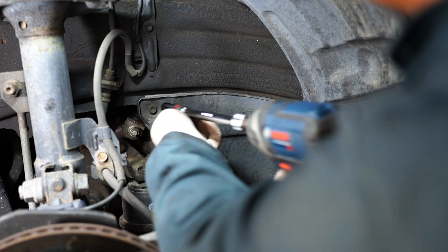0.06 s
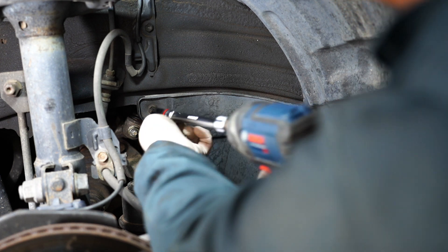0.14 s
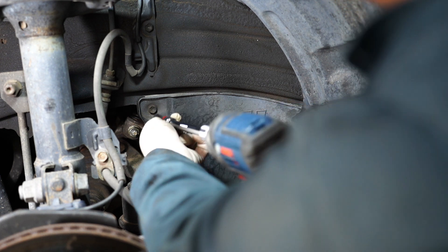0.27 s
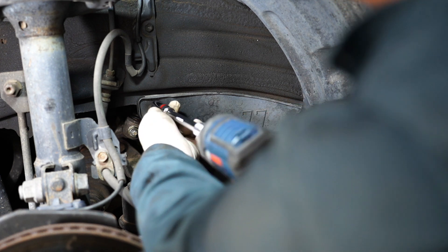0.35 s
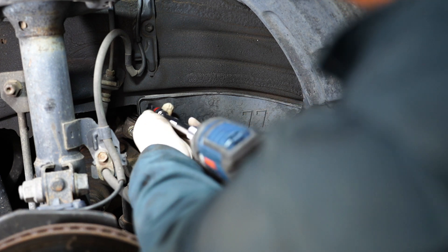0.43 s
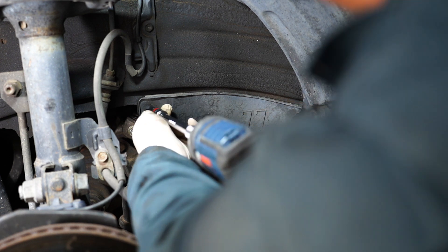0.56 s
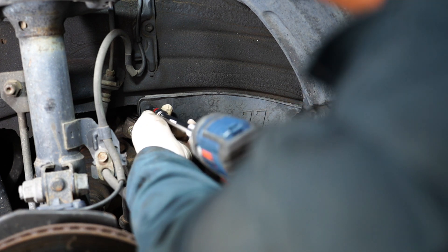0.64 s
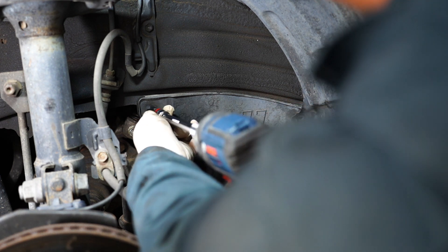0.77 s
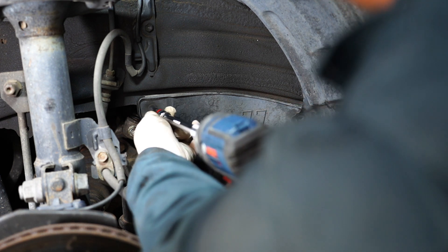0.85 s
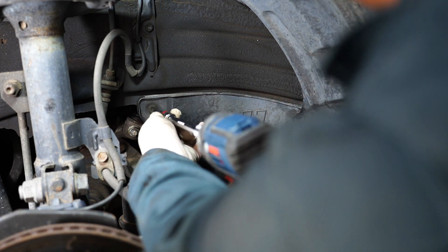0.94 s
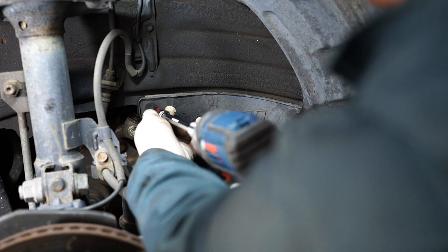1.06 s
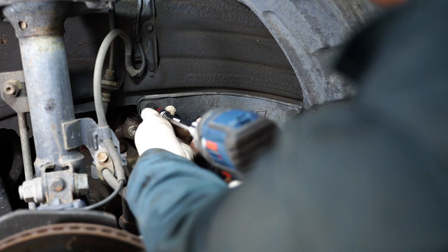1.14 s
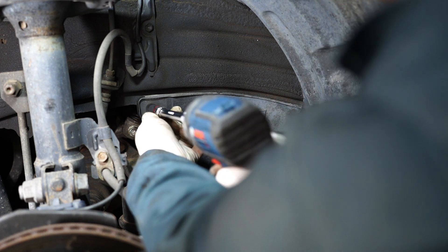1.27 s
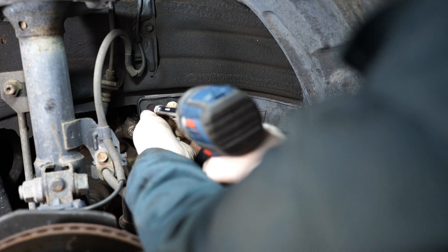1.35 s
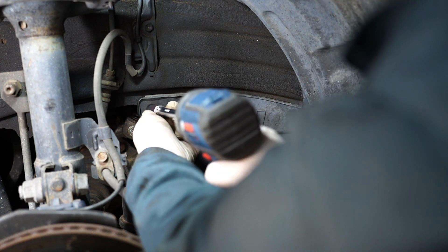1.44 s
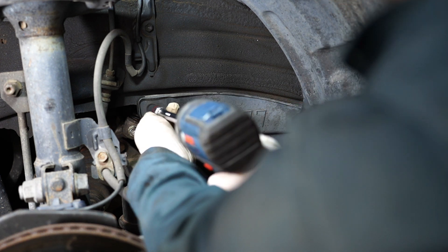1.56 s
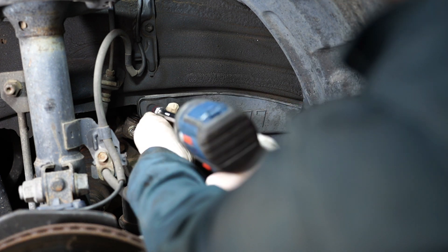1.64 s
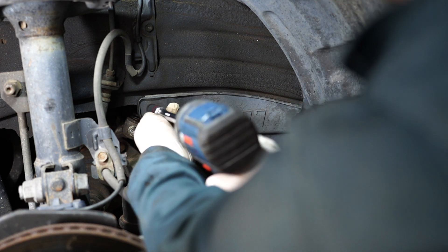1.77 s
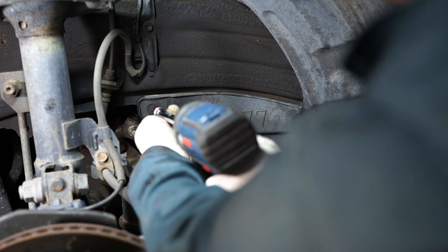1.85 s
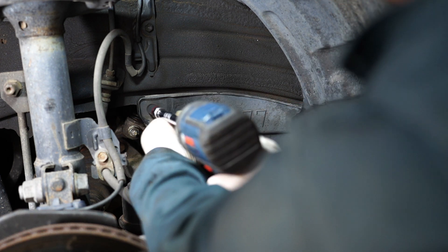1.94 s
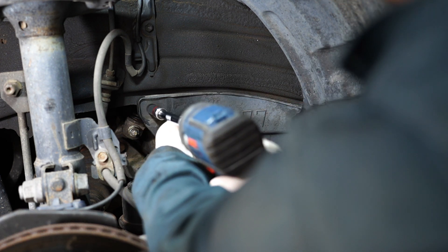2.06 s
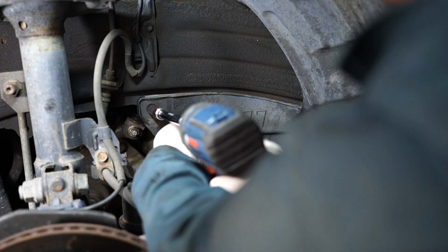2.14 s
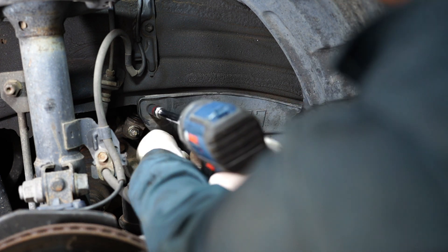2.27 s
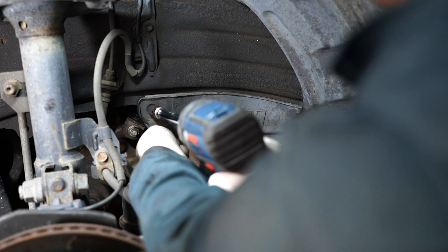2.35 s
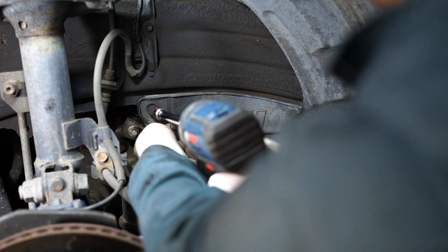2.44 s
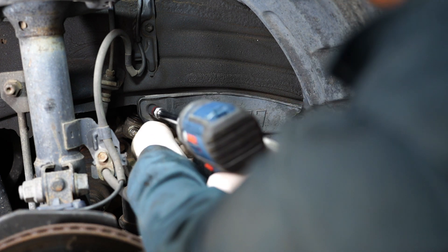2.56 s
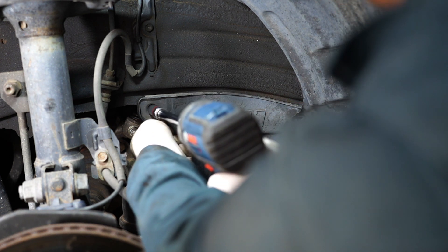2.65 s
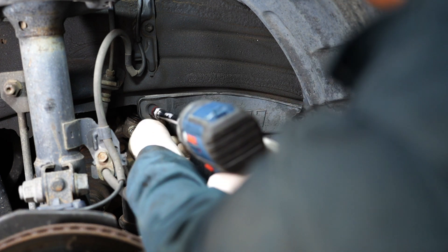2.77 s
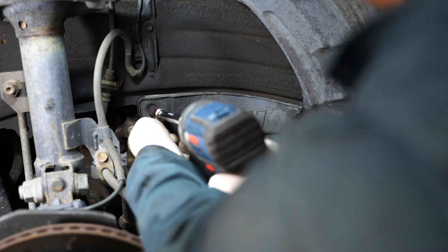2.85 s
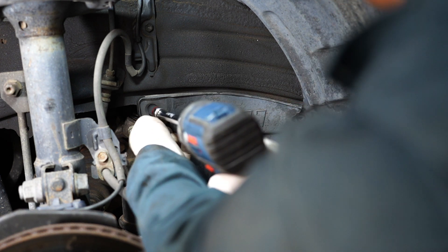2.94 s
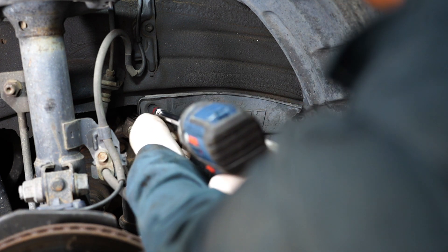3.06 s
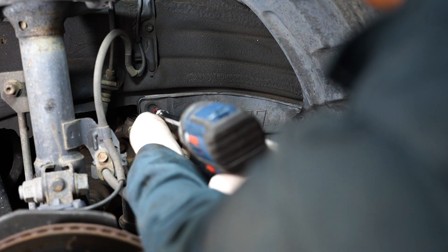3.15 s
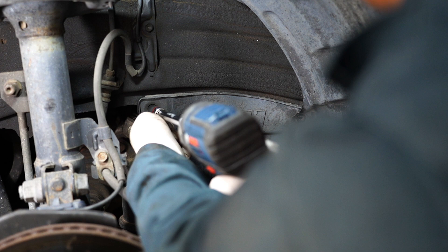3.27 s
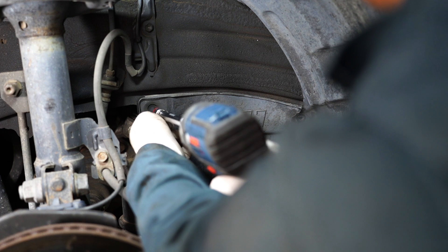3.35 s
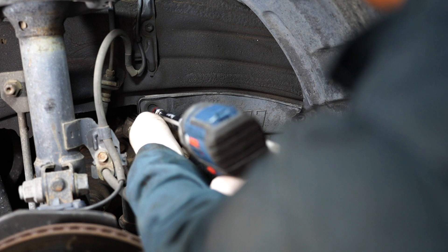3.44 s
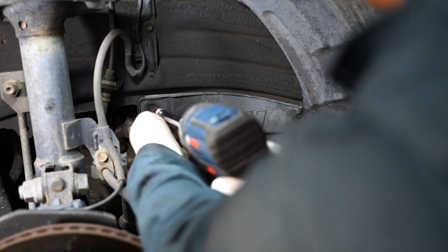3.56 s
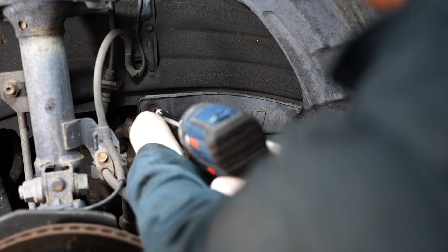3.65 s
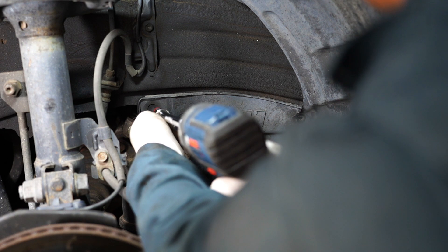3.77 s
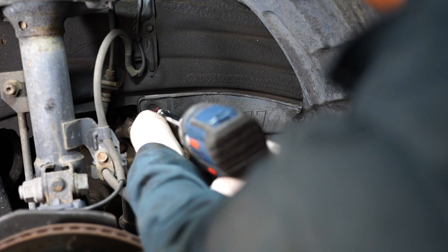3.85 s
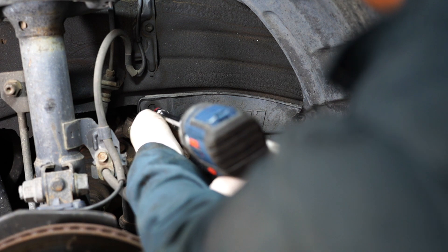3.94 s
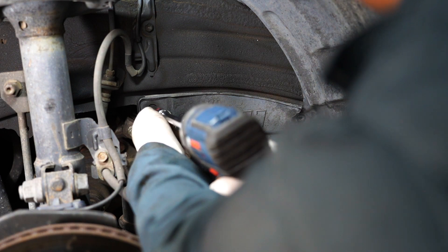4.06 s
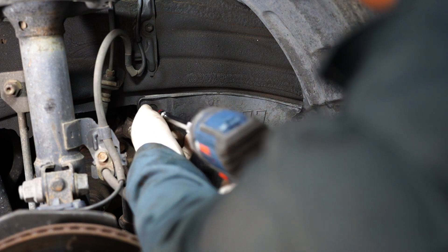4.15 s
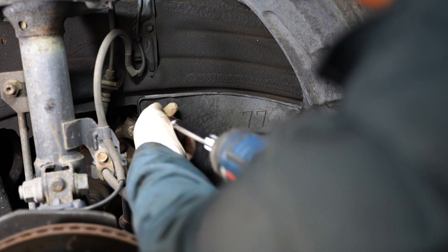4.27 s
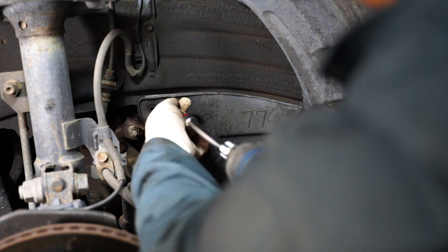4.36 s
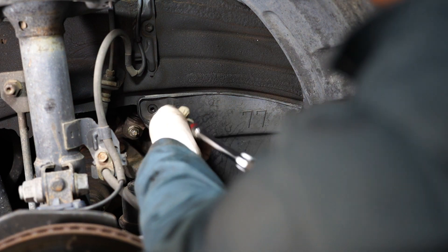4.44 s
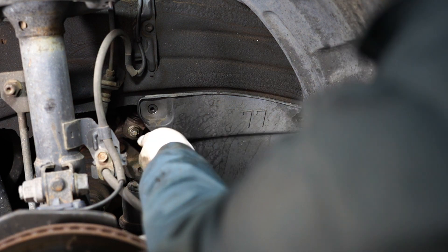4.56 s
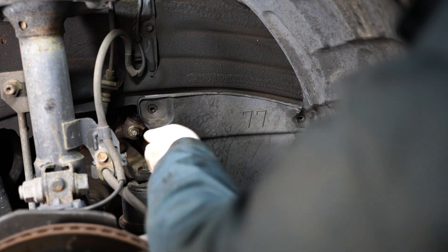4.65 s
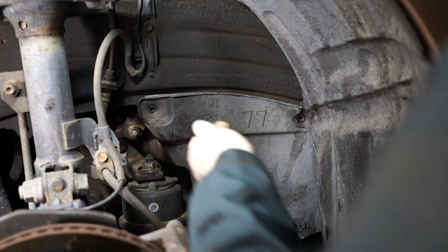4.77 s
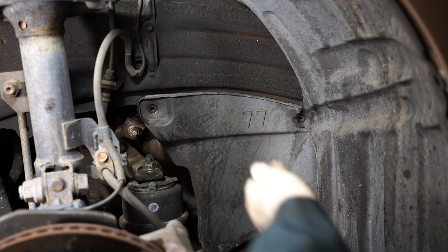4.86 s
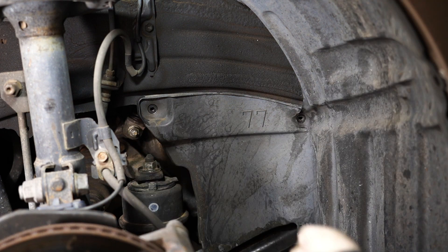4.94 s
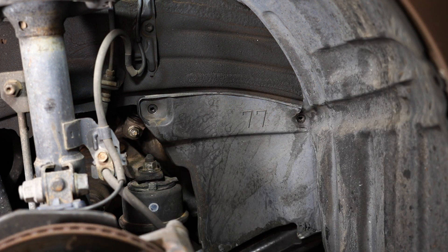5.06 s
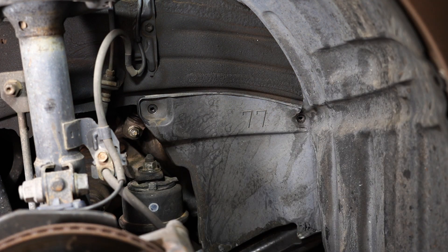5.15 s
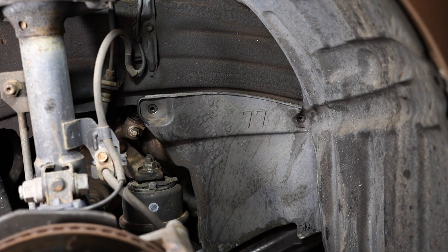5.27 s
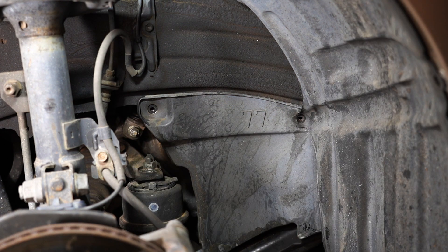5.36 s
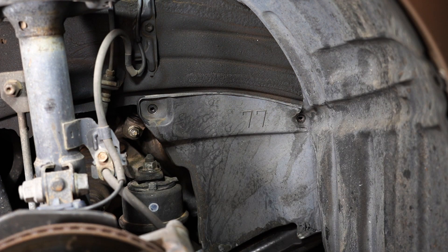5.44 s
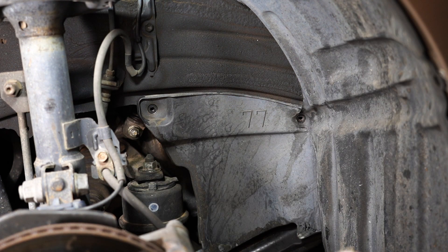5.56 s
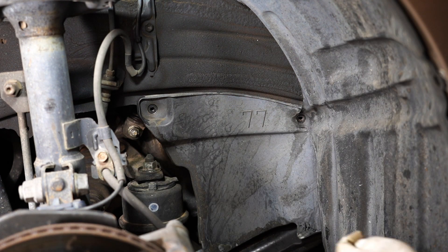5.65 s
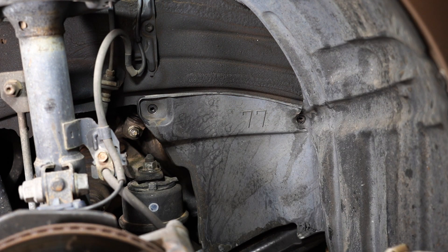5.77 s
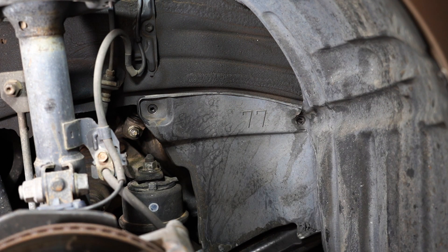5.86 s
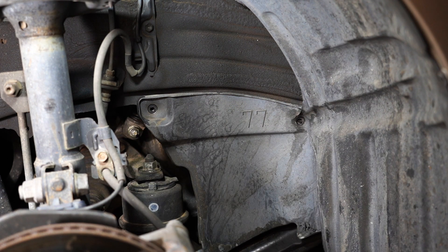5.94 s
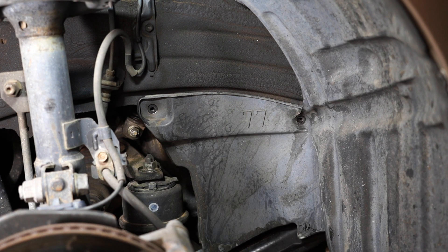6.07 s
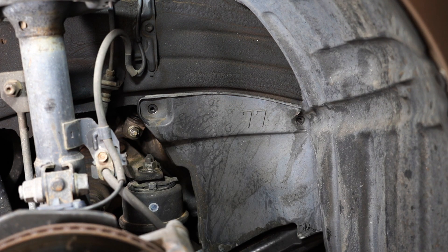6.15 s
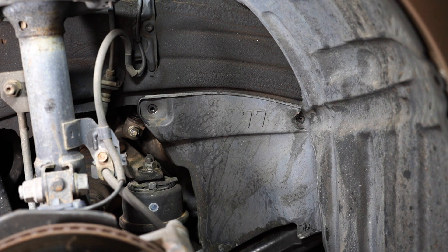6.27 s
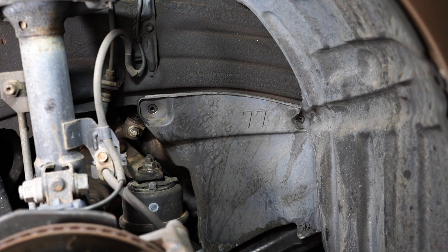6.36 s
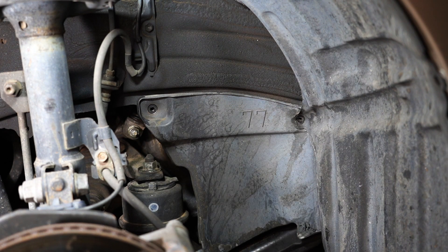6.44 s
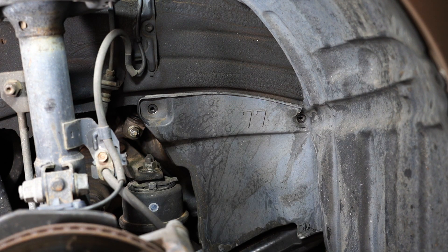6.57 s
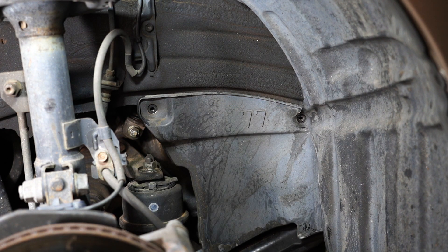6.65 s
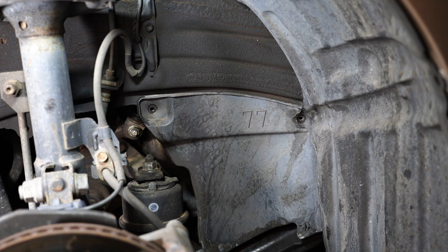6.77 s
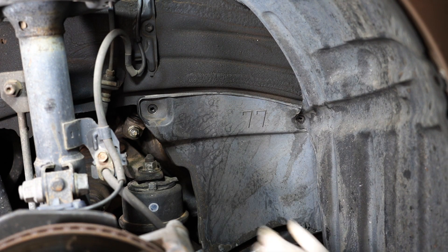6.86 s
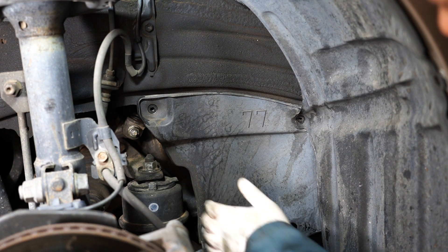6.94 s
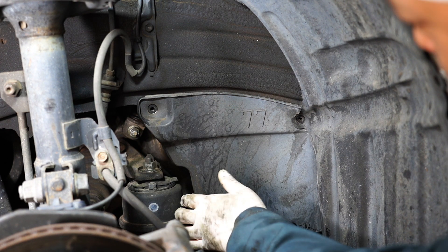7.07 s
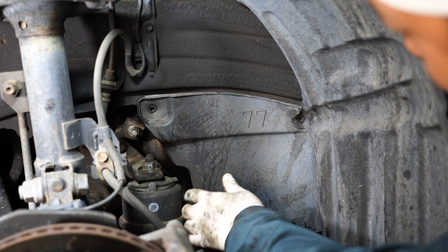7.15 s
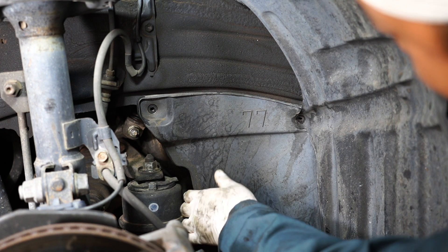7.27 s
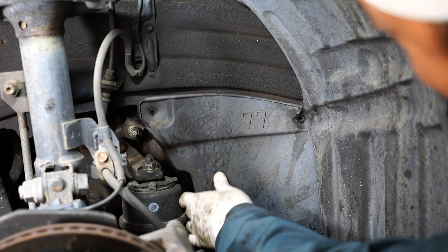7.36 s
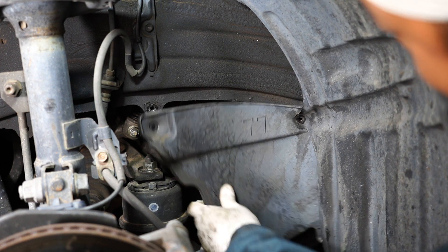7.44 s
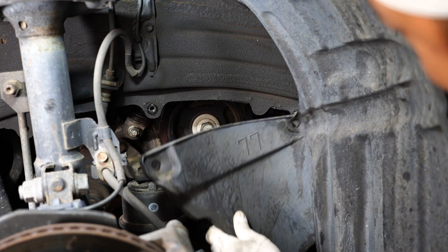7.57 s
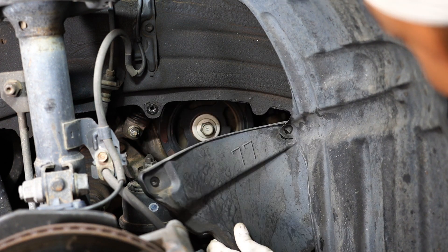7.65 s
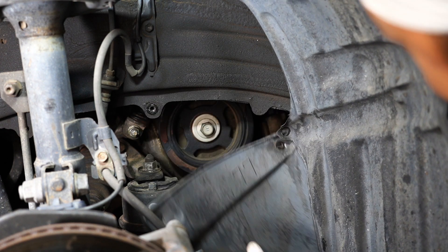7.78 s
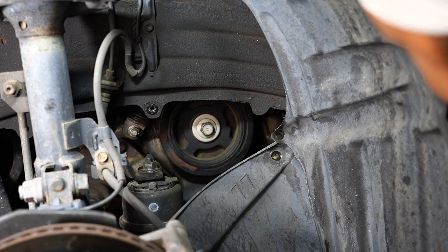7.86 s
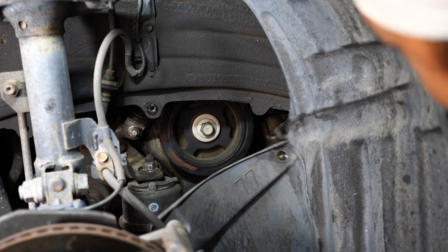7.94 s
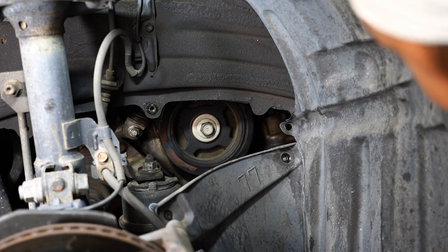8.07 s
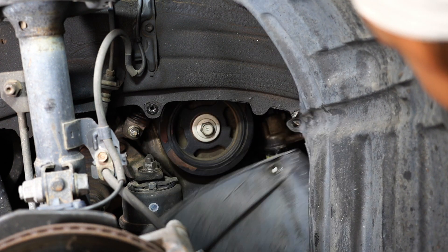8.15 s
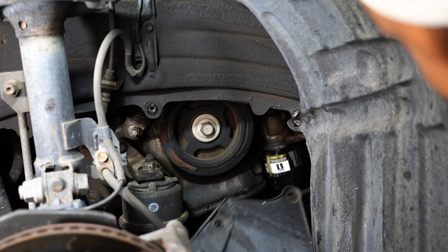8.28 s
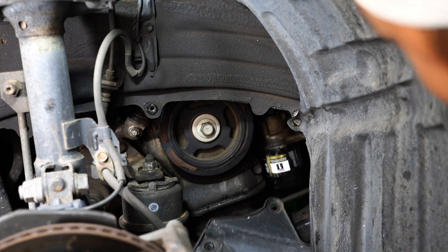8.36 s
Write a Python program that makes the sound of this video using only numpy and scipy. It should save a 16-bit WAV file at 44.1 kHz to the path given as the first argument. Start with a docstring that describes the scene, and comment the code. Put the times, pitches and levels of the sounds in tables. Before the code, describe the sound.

In a reverberant garage with low ventilation rumble, tool and hands knock dully and the socket taps hollow plastic. A cordless driver bursts on with rapid hammer blows and a rising growl, sags, then whirrs steadily as the loose bolt rattles. It stops with small clicks; steel clatters down and skids. After quiet knocks, a stiff plastic panel scrapes, cracks and booms free. Close stereo microphone, roomy echoes.

```python
"""In a reverberant garage, a cordless impact driver breaks a bolt loose in a car's wheel well and spins it out.
Socket and bolt click, the tool is laid down with a clatter, and a plastic splash panel is tugged free.
Motor, gears and the wobbling socket follow one speed; blows are short noise bursts that ring resonances.
Sleeves rustle as filtered noise over a low room hum, and moving echo paths place it all in the garage."""
import sys
import numpy as np
from scipy import signal
from scipy.fft import rfft, irfft, next_fast_len
from scipy.io import wavfile
from scipy.ndimage import map_coordinates

SR = 44100
rng = np.random.default_rng(int(sys.argv[2]) if len(sys.argv) > 2 else 0)


def wrap_up_sound(samples):
    """Save the sound to the file named by the first command line argument, as 16-bit audio."""
    columns = np.atleast_2d(samples).T
    # keep every value between -1 and 1, then stretch to whole-number steps
    tamed = np.clip(columns, -1, 1)
    steps = np.round(tamed * 32767).astype(np.int16)
    wavfile.write(sys.argv[1], SR, steps)


N = 370874
T = np.arange(N) / SR  # time axis [s]

# Hammer blows on the anvil: (time [s], level [dB], thud [dB], hardness [dB per octave])
HAMMER_BLOWS = [(1.837, -33, 16, 1.5), (1.868, -30.5, 0, 6.5), (1.901, -33.5, -2, 5.5), (1.925, -36, 3, 1)]
# Resonances of the bodywork around the bolt: (frequency [Hz], width [Hz], level [dB])
BODYWORK_MODES = [(107, 15, -15), (178, 26, -6), (212, 19, 0.5), (245, 30, -5.5), (307, 70, -2),
                  (427, 28, -7), (580, 170, -6.5), (630, 50, -12.5), (830, 33, -4.5)]
# Resonances of the plastic panel's body: (frequency [Hz], width [Hz], level [dB])
PANEL_BODY_MODES = [(162, 16, 5), (234.5, 44, 7.5), (269, 16, 1), (319, 16, 1), (454, 35, 2)]
# Resonances of the panel's bending sheet: (frequency [Hz], width [Hz], level [dB])
PANEL_SHEET_MODES = [(559, 40, 6.6), (844, 21, 1.8), (1080, 33, 1.2), (1290, 50, 3.4), (1680, 37, 3.4)]
# High ring of the small bolt: (frequency [Hz], width [Hz], level [dB])
BOLT_MODES = [(15120, 60, 0), (15260, 200, -5), (15550, 120, -12)]
# Colour of a plain dull knock: (frequency [Hz], level [dB])
DULL_COLOUR = [(50, 14.5), (130, 12.5), (230, 16), (850, 0.5), (3000, -14), (10000, -30.5), (16000, -40)]
# Colour of a plain blow on the panel: (frequency [Hz], level [dB])
PLASTIC_COLOUR = [(50, -9), (130, 1.5), (230, 1), (850, 0), (3000, -13.5), (10000, -27.5), (16000, -40)]
# Tugs that drag the panel along its edge: (time [s], hold [s], fall [s], level [dB])
PANEL_TUGS = [(7.361, 0.018, 0.035, -48.5), (7.487, 0.026, 0.017, -27.5), (7.542, 0.04, 0.033, -36.5),
              (7.765, 0.019, 0.02, -37), (7.79, 0.023, 0.035, -29.5), (7.986, 0.075, 0.031, -36.5),
              (8.188, 0.14, 0.047, -28)]
TUG_RISE_S = 0.0096
# a blow's thud lifts the bass below THUD_HZ; its hardness tilts the treble above BODY_HZ
THUD_HZ, BODY_HZ = 232, 820


def undb(db):
    """Decibels to gain."""
    return 10 ** (np.asarray(db) / 20)


def unit(x):
    """Scale to rms 1."""
    return x / np.sqrt(np.mean(x ** 2))


def along(points, hz):
    """Read (Hz, value) points on a log-frequency axis."""
    f, value = np.transpose(points)
    return np.interp(np.log(np.maximum(hz, 1)), np.log(f), value)


def colour(x, points):
    """Filter to a (Hz, dB) response, with the filter's energy as early as it can be."""
    size = 2048
    cepstrum = irfft(np.log(undb(along(points, np.fft.rfftfreq(size, 1 / SR)))))
    # folding the cepstrum onto its first half keeps the filter from sounding before its input
    cepstrum[1:size // 2] *= 2
    cepstrum[size // 2 + 1:] = 0
    response = irfft(np.exp(rfft(cepstrum)))
    return signal.oaconvolve(x, response)[:len(x)]


def ring(x, modes):
    """Resonances (Hz, width Hz, dB) side by side, all driven by x."""
    return sum(undb(db) * signal.lfilter(*signal.iirpeak(hz, hz / width, SR), x) for hz, width, db in modes)


def pitched(modes, ratio):
    """The same resonances, higher or lower by a ratio."""
    return [(hz * ratio, width, db) for hz, width, db in modes]


def walk(rate):
    """Random wander with a spread near 1 that heads for a new value `rate` times a second."""
    return np.interp(T * rate, np.arange(4096), rng.standard_normal(4096))


def grit(spread_db):
    """A dense stream of tiny contacts of very unequal size, as noise whose level jumps every 16 samples."""
    jumps = np.repeat(rng.exponential(size=N // 16 + 1), 16)[:N]
    return unit(rng.standard_normal(N) * undb(spread_db * np.minimum(jumps, 6)))


def glide(x, rate):
    """Play a sound at a changing rate, so that all its resonances slide together."""
    return map_coordinates(x, [np.cumsum(rate) - rate[0]], order=3)


def swell(s, hold_s, rise_s, fall_s):
    """Envelope that rises to 1 at time s, holds, and dies away."""
    before = np.maximum(s - T, 0) / rise_s
    after = np.maximum(T - s - hold_s, 0) / fall_s
    return np.exp(-np.minimum(before + after, 20))


def add(track, s, sound):
    """Mix a sound in at time s."""
    start = max(int(s * SR), 0)
    track[start:start + len(sound)] += sound[:N - start]


def contact(chatter_s, snap, rough_db=5.5, rise_s=.0015):
    """One hard contact in a burst of uneven small ones, pushing all frequencies evenly."""
    size = 8192
    t = T[:size]
    sizes = undb(rough_db * np.repeat(rng.standard_normal(size // 32), 32))
    envelope = np.exp(-t / chatter_s) * (1 - np.exp(-(t / rise_s) ** 2))
    force = sizes * rng.standard_normal(size) * envelope
    force[int(rise_s * SR)] += snap * np.linalg.norm(force)
    # keep only the phases, so that every frequency is equally strong
    return irfft(np.exp(1j * np.angle(rfft(force, 2 * size))))[:size]


def struck(force, modes, plain, thud_db, hardness_db):
    """A contact rings the struck thing: heavier blows add bass, harder ones treble."""
    shape = []
    for hz, db in plain:
        bass_db = along([(THUD_HZ, thud_db), (BODY_HZ, 0)], hz)
        treble_db = hardness_db * max(np.log2(hz / BODY_HZ), 0)
        shape.append((hz, db + bass_db + treble_db))
    return unit(colour(force + ring(force, modes), shape))


def bouncing(blow, modes, plain, snap, rise_share, gap_s, flap_s, heavier_db, softer_db, loss_db, count):
    """A blow on something springy, then rebounds that change level, bass and hardness step by step."""
    db, thud_db, hardness_db, chatter_s, rebound_db = blow
    out = np.zeros(SR // 2)
    force = contact(chatter_s, snap, rise_s=rise_share * chatter_s)
    add(out, 0, undb(db) * struck(force, modes, plain, thud_db, hardness_db))
    for k in range(1, count + 1):
        force = contact(flap_s, snap, rise_s=rise_share * flap_s)
        flap = struck(force, modes, plain, thud_db + k * heavier_db, hardness_db - k * softer_db)
        add(out, k * gap_s, undb(db + rebound_db - k * loss_db) * flap)
    return out


def diffuse(size):
    """Two channels of noise from all sides: alike in the bass, nearly unrelated in the treble."""
    # Left-right likeness of sound from all sides: (frequency [Hz], correlation [-1 to 1])
    likeness_points = [(60, 1), (130, 1), (250, 0.99), (500, 0.85), (1000, 0.48), (2000, 0), (12000, 0.14)]
    mid, side = rfft(rng.standard_normal((2, size)))
    likeness = np.clip(along(likeness_points, np.fft.rfftfreq(size, 1 / SR)), -1, 1)
    mid, side = mid * np.sqrt(1 + likeness), side * np.sqrt(1 - likeness)
    return irfft([mid + side, mid - side], size) / np.sqrt(2)


def garage(x, near_db, far_db, pan_db, near_s=0.014, move_hz=7., count=3):
    """Direct sound, quick echoes between the car's panels, then the long tail of the garage."""
    # How long the tail takes to die away by 60 dB: (frequency [Hz], time [s])
    decay_times = [(250, 0.64), (1000, 0.75), (4000, 0.62), (16000, 0.33)]
    size = 32768
    t, hz = T[:size], np.fft.rfftfreq(size, 1 / SR)
    spectrum = rfft(np.array([diffuse(size) for _ in range(count)])).astype(np.complex64)
    # tail: four overlapping bands two octaves apart, each with its own decay
    far, steps = 0, np.log2(np.clip(hz, 250, 16000) / 250) / 2
    for k in range(4):
        band = irfft(spectrum * np.maximum(1 - abs(steps - k), 0).astype(np.float32))
        far = far + band * np.exp(-np.log(1000) * t / along(decay_times, 250 * 4 ** k))
    far = far * (1 - np.exp(-t / 0.0063))
    # quick echoes: the same noise, shifted by half its length, with a fast decay
    near = np.roll(irfft(spectrum), size // 2, axis=-1)
    near = near * np.exp(-t / near_s) * (1 - np.exp(-t / 0.00024))
    response = (undb(near_db) * unit(near) + undb(far_db) * unit(far)) / np.sqrt(size)
    response[:, 0, 1] += 1  # direct sound: the left ear is a sample further away
    response[:, 1, 0] += 1
    balance = undb(np.array([[pan_db], [-pan_db]]) / 2)
    response = unit(response) / np.sqrt(size) * balance
    # arms and tool keep moving, so the sound drifts between several sets of echo paths
    share = np.array([walk(move_hz) for _ in range(count)])
    share = share / np.sqrt(np.sum(share ** 2, axis=0))
    length = next_fast_len(N + size, True)
    sources = rfft((x * share).astype(np.float32), length)[:, None]
    paths = sources * rfft(response.astype(np.float32), length)
    return irfft(paths.sum(axis=0), length)[:, :N]


def room_noise(air_db=-52):
    """Steady ventilation rumble as coloured noise, with a hum that wavers in level and pitch."""
    # Colour of the rumble: (frequency [Hz], level [dB])
    air_colour = [(26, -10), (45, 1.5), (136, -4), (260, -9), (338, -14.5), (420, -8.5), (485, -15),
                  (679, -16), (863, -21.5), (1070, -17), (1210, -19.5), (3390, -29.5), (7680, -30.5),
                  (14000, -35)]
    # Hum tones: (frequency [Hz], level [dB])
    hum_tones = [(118.4, -55)]
    air = unit(np.array([colour(channel, air_colour) for channel in diffuse(N)]))
    air = air * undb(air_db + 0.29 * walk(5.9))
    hum = 0
    for hz, db in hum_tones:
        level = undb(db + 1.6 * walk(1.76))
        hum = hum + level * np.sin(2 * np.pi * hz * T + 0.11 * walk(5.3))
    return air + hum


def sleeves():
    """Work clothes brush the car in a fine, uneven hiss."""
    # Brushes of a sleeve: (time of the peak [s], level [dB], rise [s], fall [s])
    brushes = [(0.27, -56, 0.0052, 0.074), (4.788, -45, 0.11, 0.062), (5.18, -45, 0.03, 0.057),
               (6.216, -55, 0.047, 0.057), (7.12, -56.5, 0.48, 0.035)]
    # Colour of rubbing cloth: (frequency [Hz], level [dB])
    cloth_colour = [(290, -51), (500, -13), (585, -9), (1080, -5), (1170, 0), (1650, -3.5), (3770, -1),
                    (15000, -14.5)]
    level = sum(undb(db) * swell(s, 0, rise_s, fall_s) for s, db, rise_s, fall_s in brushes)
    return unit(colour(grit(3.5), cloth_colour)) * level * undb(0.8 * walk(35))


def ticks():
    """The stiff plastic panel ticks drily as a glove takes hold of it."""
    # Ticks under the glove: (time [s], level [dB], hardness [dB per octave])
    glove_ticks = [(7.149, -54.5, 11.5), (7.271, -48.5, 7)]
    out = np.zeros(N)
    for s, db, hardness_db in glove_ticks:
        force = contact(chatter_s=0.0028, snap=0.33)
        add(out, s, undb(db) * struck(force, PANEL_BODY_MODES, PLASTIC_COLOUR, 0, hardness_db))
    return out


def drag(flex=0.06, sheet_db=7):
    """The panel's edge sticks and slips, ringing the sheet, whose pitch wanders as it flexes."""
    # Colour of the scraping edge: (frequency [Hz], level [dB])
    scrape_colour = [(41, -39), (70, -1), (189, -10.5), (260, -0.5), (408, -4), (560, -12), (751, -9),
                     (1290, -15), (2270, -17.5), (2910, -17.5), (15500, -39.5)]
    slips = grit(3.4) * undb(3.8 * walk(110))
    flexing = 1 + flex * np.sin(2 * np.pi * 5.1 * T)
    rings = glide(undb(sheet_db) * ring(slips, PANEL_SHEET_MODES), flexing)
    sheet = unit(colour(slips + 0.35 * rings, scrape_colour))
    return sheet * sum(undb(db) * swell(s, hold_s, TUG_RISE_S, fall_s) for s, hold_s, fall_s, db in PANEL_TUGS)


def crackle(cracks_per_s=130, crackle_db=-9.5):
    """Sharp cracks at random moments of the stiff plastic while it is being pulled."""
    sizes = undb(4.5 * np.clip(rng.standard_normal(N), -2, 2))
    spikes = (rng.random(N) < cracks_per_s / SR) * sizes
    sheet = unit(colour(spikes + ring(spikes, PANEL_SHEET_MODES), PLASTIC_COLOUR))
    level = sum(undb(db + crackle_db) * swell(s, hold_s, TUG_RISE_S, fall_s)
                for s, hold_s, fall_s, db in PANEL_TUGS)
    return sheet * level


def cracks():
    """The panel's stiff edge clicks sharply each time it slips past the bodywork."""
    # Clicks of the edge: (time [s], level [dB], pitch [ratio])
    edge_clicks = [(7.336, -56, 1.1), (7.451, -66, 1.1), (7.483, -44, 0.92), (7.521, -40, 1.2),
                   (7.598, -39.5, 0.9), (7.791, -35.5, 1.1), (7.988, -44, 0.71), (8.014, -38, 1.06),
                   (8.036, -44.5, 1.23), (8.192, -39, 0.93), (8.222, -40, 0.97), (8.233, -35.5, 1.43),
                   (8.281, -41, 1.57), (8.301, -38, 1.3), (8.323, -46, 1.1)]
    # Resonances of the edge: (frequency [Hz], width [Hz], level [dB])
    edge_modes = [(1357, 170, 4), (1800, 820, 4.5), (2850, 370, 7.5), (3720, 450, -9)]
    # Colour of the clicks: (frequency [Hz], level [dB])
    edge_colour = [(200, 7), (1000, 7.5), (3500, -8.5), (7000, -12), (16000, -19)]
    out = np.zeros(N)
    for s, db, pitch in edge_clicks:
        force = contact(chatter_s=0.002, snap=0.6, rise_s=0.0008)
        add(out, s, undb(db) * unit(colour(ring(force, pitched(edge_modes, pitch)), edge_colour)))
    return out


def thumps():
    """The whole panel swings and bumps the car with a short, deep boom from wide low resonances."""
    # Booms of the swinging panel: (time [s], level [dB], pitch [Hz])
    booms = [(7.525, -39, 100), (7.825, -39.5, 139), (8.051, -35.5, 135), (8.191, -41, 89),
             (8.279, -36, 129)]
    out = np.zeros(N)
    for s, db, hz in booms:
        force = contact(chatter_s=0.0045, snap=0.83)
        boom = ring(force, [(hz, 70, 0), (2 * hz, 90, -3)])
        add(out, s, undb(db) * unit(ring(boom, [(0.91 * hz, 200, 0)])))
    return out


def panel(bend=0.117, relax_s=0.0407):
    """The freed sheet flaps twice after every snap, and its pitch sinks as the bend lets go."""
    # Snaps as the panel catches and comes free: (time [s], level [dB], thud [dB],
    # hardness [dB per octave], chatter [s], rebound [dB], pitch of the sheet [ratio])
    snaps = [(7.522, -30, -6.5, 1.5, 0.005, -2.5, 1.1), (7.599, -46, 6, 2, 0.0031, -31, 1.6),
             (7.791, -29.5, 3.5, -3, 0.0038, -2.5, 1.0), (7.988, -42.5, 3, 1.5, 0.005, -26, 1.03),
             (8.012, -40, -9.5, -2, 0.0033, 2, 1.14), (8.192, -41, -17, 0.5, 0.016, -14, 1.0),
             (8.226, -34.5, -10, 1.5, 0.02, -20, 0.97), (8.274, -29, 5, 1.5, 0.0047, -5.5, 1)]
    out = np.zeros(N)
    for s, *blow, pitch in snaps:
        modes = PANEL_BODY_MODES + pitched(PANEL_SHEET_MODES, pitch)
        snap = bouncing(blow, modes, PLASTIC_COLOUR, snap=0.48, rise_share=0.22, gap_s=0.014, flap_s=0.017,
                        heavier_db=6.5, softer_db=2.0, loss_db=-0.5, count=2)
        # each snap starts sharp by the share `bend`, then relaxes
        add(out, s, glide(snap, 1 + bend * np.exp(-T[:len(snap)] / relax_s)))
    return out


def knocks():
    """Tool, hands and feet knock dully, and each knock settles with one low thud."""
    # Dull knocks: (time [s], level [dB], thud [dB], hardness [dB per octave], chatter [s], rebound [dB])
    dull_knocks = [(0.1, -36.5, -6.5, 3, 0.027, -11.5), (0.2, -43, -16.5, 0.4, 0.023, -1),
                   (0.398, -49, -15, 0, 0.044, -16), (1.002, -49.5, -10, -2, 0.005, 2.5),
                   (5.782, -40.5, -7.5, 0.5, 0.0036, -2.5), (6.08, -58, -18, 2, 0.0084, -6),
                   (6.2, -50.5, -6.5, 2.5, 0.04, 4), (6.581, -43, -6, 0.5, 0.01, 2),
                   (6.811, -52.5, -6, -2, 0.022, -1)]
    # Resonances of the knocked things: (frequency [Hz], width [Hz], level [dB])
    knock_modes = [(159.3, 6.4, 3), (250, 32, 1), (331.5, 13, 2), (456, 15, 0), (630, 22, -2.5),
                   (856, 12, -16)]
    out = np.zeros(N)
    for s, *blow in dull_knocks:
        knock = bouncing(blow, knock_modes, DULL_COLOUR, snap=0.34, rise_share=0.22, gap_s=0.029, flap_s=0.011,
                         heavier_db=11.5, softer_db=-1, loss_db=1.5, count=1)
        add(out, s, knock)
    return out


def taps():
    """The socket feels for the bolt and taps the hollow liner, at a pitch set by where it lands."""
    # Taps on the liner: (time [s], level [dB], pitch [ratio], chatter [s], hardness [dB per octave])
    liner_taps = [(0.521, -40, 0.994, 0.0048, -2.5), (0.893, -49, 0.85, 0.018, -1),
                  (0.93, -46.5, 1.205, 0.0011, 3)]
    # Resonances of the hollow liner: (frequency [Hz], width [Hz], level [dB])
    liner_modes = [(190, 49, -2), (330, 60, 0), (650, 150, 0), (880, 120, 3), (1250, 90, -14),
                   (1600, 350, -12), (2200, 300, -13)]
    # Colour of a plain tap: (frequency [Hz], level [dB])
    liner_colour = [(100, 6), (1000, 2), (2700, 1), (3300, -15), (5500, -14), (16000, -32)]
    out = np.zeros(N)
    for s, db, pitch, chatter_s, hardness_db in liner_taps:
        force = contact(chatter_s, snap=0.3, rise_s=0.25 * chatter_s)
        # hardness tilts the colour within an octave either side of BODY_HZ
        shape = [(hz * pitch, plain_db + hardness_db * np.clip(np.log2(hz / BODY_HZ), -1, 1))
                 for hz, plain_db in liner_colour]
        add(out, s, undb(db) * unit(colour(ring(force, pitched(liner_modes, pitch)), shape)))
    return out


def skid(start_s=5.503, hold_s=0.1, db=-38, bolt_db=-14):
    """The steel tool skids for a moment after it lands, in a dense run of small contacts."""
    # Colour of skidding steel: (frequency [Hz], level [dB])
    skid_colour = [(200, -24), (600, -17), (1150, 2), (2500, 10), (7000, 7), (10000, -17), (16000, -12)]
    slips = grit(6.5)
    sound = unit(colour(slips, skid_colour)) + undb(bolt_db) * unit(ring(slips, BOLT_MODES))
    return undb(db) * sound * swell(start_s, hold_s, rise_s=0.006, fall_s=0.046)


def steel():
    """Socket and tool clack, the socket's shank rings on, and the small bolt rings high above them."""
    # Steel on steel and concrete: (time [s], level [dB], thud [dB], hardness [dB per octave],
    # bolt ring [dB], socket ring [dB], pitch of the clack [ratio])
    clacks = [(1.033, -35.5, -3, 1.5, -30, -11, 0.91), (1.473, -61, 15, 1.5, -25, -22, 1.3),
              (4.07, -48.5, 1, 6, -22, -30, 0.94), (4.259, -60, 9, 1.5, -7, -25, 0.8),
              (4.543, -63, 4, 2.5, -13, -24, 1), (4.595, -58, -2, 5, -13, -20, 0.97),
              (5.241, -37, -13, 6.5, 0.5, -29, 0.94), (5.249, -52, -2, 6, 0, -25, 0.89),
              (5.42, -32.5, 1, 0.4, -19, -31, 0.97), (5.466, -41, 2, 0, -11, -28, 0.7),
              (5.489, -31.5, -8, 1, -20, -27, 0.82), (5.508, -38.5, -8, 7, -20, -30, 1.3),
              (5.545, -38, -17, 4, -9, -28, 0.76), (5.715, -48.5, -8, 3, 3, -25, 1)]
    # Resonances of the clack: (frequency [Hz], width [Hz], level [dB])
    clack_modes = [(1420, 170, 1), (1620, 170, -1), (2750, 300, -8), (5250, 350, 0), (5850, 350, -2)]
    # Long ring of the socket's shank: (frequency [Hz], width [Hz], level [dB])
    socket_modes = [(1440, 5, 6), (1530, 7.1, 8), (1617, 8, 5), (2700, 16, 3), (4980, 16, -3),
                    (5140, 7.5, 4), (5250, 11, -4), (5500, 12, 0), (5920, 7, -17)]
    # Colour of a plain clack: (frequency [Hz], level [dB])
    clack_colour = [(50, -42), (230, -2.5), (850, -0.5), (1400, 1.5), (2200, 0.5), (3000, -2), (6000, -6.5),
                    (10000, -12.5), (16000, -23.5)]
    out = np.zeros(N)
    for s, db, thud_db, hardness_db, bolt_db, socket_db, pitch in clacks:
        force = contact(chatter_s=0.004, snap=0.78, rough_db=4.0)
        clack = struck(force, pitched(clack_modes, pitch), clack_colour, thud_db, hardness_db)
        bolt = undb(bolt_db) * unit(ring(force, BOLT_MODES))
        socket = undb(socket_db) * unit(ring(force, socket_modes))
        add(out, s, undb(db) * (clack + bolt + socket))
    return out


def catches():
    """The loose bolt snags in its thread and knocks the bodywork."""
    # Snags of the bolt: (time [s], level [dB])
    snags = [(2.408, -62), (2.508, -58), (2.604, -48), (2.702, -46), (2.784, -49.5), (2.878, -49),
             (3.049, -50), (3.502, -45), (3.522, -49), (3.667, -46.5), (3.695, -54), (3.811, -49),
             (3.98, -64)]
    out = np.zeros(N)
    for s, db in snags:
        force = contact(chatter_s=0.0079, snap=0.18)
        add(out, s, undb(db) * struck(force, BODYWORK_MODES, DULL_COLOUR, thud_db=-15.0, hardness_db=-9.0))
    return out


def squeal(db=-33.5, overtone_db=-13):
    """The tight thread growls as it lets go, rising in pitch as the bolt gathers speed."""
    start_s, hold_s, start_hz, rise_hz_per_s = 1.868, 0.135, 625, 1000
    hz = start_hz + rise_hz_per_s * np.clip(T - start_s, 0, 2 * hold_s)
    hz = hz * (1 + 0.025 * walk(200))  # the pitch is rough
    phase = 2 * np.pi * np.cumsum(hz) / SR
    growl = (np.sin(phase) + undb(overtone_db) * np.sin(2 * phase)) * undb(3.5 * walk(160))
    return undb(db) * growl * swell(start_s, hold_s, rise_s=0.0041, fall_s=0.014)


def hammer():
    """A few quick blows on the anvil break the bolt loose."""
    # Resonances of the anvil: (frequency [Hz], width [Hz], level [dB])
    anvil_modes = [(660, 110, 5), (1540, 280, 1), (3270, 110, -2)]
    # Colour of a plain blow on the anvil: (frequency [Hz], level [dB])
    anvil_colour = [(50, -38), (130, -3), (230, 3.5), (850, 13), (3000, 3), (10000, -9.5), (16000, -17)]
    out = np.zeros(N)
    for s, db, thud_db, hardness_db in HAMMER_BLOWS:
        force = contact(chatter_s=0.01, snap=0.38)
        add(out, s, undb(db) * struck(force, anvil_modes, anvil_colour, thud_db, hardness_db))
    return out


def trigger(pwm_hz=15571, db=-61, press_s=1.52, hold_s=2.58):
    """The speed control sings thinly for as long as the trigger is held."""
    return undb(db) * np.sin(2 * np.pi * pwm_hz * T) * swell(press_s, hold_s, rise_s=0.0057, fall_s=.005)


def driver(wobble_turn=0.58, rub_turn=0.37, jolt_turn=0.3):
    """Gear teeth rattle, the turning socket rubs and jolts the bolt, and the motor whines at its speed."""
    # Motor speed, a burst against the tight bolt, a sag, then the long run: (time [s], turns per second [Hz])
    motor_speed = [(1.78, 257), (1.92, 429), (1.965, 454), (2.0, 437), (2.03, 425), (2.07, 402), (2.1, 389),
                   (2.125, 413.6), (2.17, 372.3), (2.33, 225), (2.45, 291), (2.6, 338), (2.8, 378.6),
                   (3.3, 401), (3.66, 412.6), (3.85, 409), (4.0, 420), (4.2, 260.3)]
    # Colour of the gears: (frequency [Hz], level [dB])
    gear_colour = [(590, -33.5), (1000, -10), (1530, -1), (1790, -6.5), (1970, 0), (2360, -1.5),
                   (2940, -6.5), (3740, -2.5), (4870, -8), (9470, -15), (12600, -13.5), (15500, -18.5)]
    # Tones of the motor whine: (multiple of the speed [ratio], level [dB])
    whine_tones = [(1, -8), (2, -6), (3, -9), (4, -3), (5, -2), (6, 3), (7, -3), (8, 3), (9, -4), (10, 1.5),
                   (12, -8)]
    # Pulls of the trigger: (time [s], hold [s], rise [s], fall [s], level at full speed [dB],
    # rumble of the bolt in its thread relative to that level [dB])
    trigger_pulls = [(1.806, 0.36, 0.0082, 0.041, -37, 2.5), (2.44, 1.541, 0.043, 0.074, -41.5, -1.5)]
    # gears grow louder with speed, their hiss much more so
    full_speed_hz, gear_db_per_octave, hiss_db, hiss_db_per_octave = 418, 4.5, 1.5, 13
    hz = np.interp(T, *np.transpose(motor_speed))
    octaves = np.log2(hz / full_speed_hz)
    loose = T > 2.4

    # geared down 66.4 to 1, the socket wobbles once a turn when the bolt runs loose, and rubs twice a turn
    socket = np.cumsum(hz) / SR / 66.4
    socket = socket - np.interp(2.5, T, socket)
    wobble = loose * np.cos(2 * np.pi * (socket - wobble_turn))
    rubbing = loose * np.cos(4 * np.pi * (socket - rub_turn))
    rub = undb(1.5 * wobble + 1.4 * rubbing)

    # under strain the motor holds a clean note; running loose it stumbles, and the rubs break up its whine
    stumble = (.002 + .012 * loose) * walk(130)
    turns = np.cumsum(hz * (1 - .015 * rubbing + stumble)) / SR
    waver_db = 2 + 3 * loose
    whine = 0
    for k, tone_db in whine_tones:
        level = undb(tone_db + waver_db * walk(45))
        whine = whine + level * np.sin(2 * np.pi * (k * turns + rng.random()))
    # the whine stands out while the motor strains against the tight bolt
    strain = swell(2.03, 0.135, rise_s=0.1, fall_s=0.025)
    whine = unit(whine) * rub ** 3 * undb(-7 + 14 * strain)

    # the teeth meet harder once in every turn of the motor
    teeth = colour(grit(3.2) * (1 + 0.6 * np.cos(2 * np.pi * turns)), gear_colour)
    low, high = (np.tile(signal.butter(2, 5500, kind, fs=SR, output="sos"), (2, 1)) for kind in ("low", "high"))
    rattle, hiss = unit(signal.sosfilt(low, teeth)), unit(signal.sosfilt(high, teeth))
    # the thread rumbles from the first hammer blow on; the hiss joins when the second frees the bolt
    hiss = hiss * (T > HAMMER_BLOWS[1][0])
    hiss = hiss * undb(hiss_db + hiss_db_per_octave * octaves + 0.3 * walk(30.5))

    # each quarter turn of the socket jolts the bolt and shakes the gears
    jolts_per_turn, jolt_share, jolt_floor = 4, 0.16, 0.13
    jolt = jolt_floor + np.exp(-((jolts_per_turn * socket - jolt_turn) % 1) / jolt_share)
    chatter = unit((1 + jolt) * undb(1.5 * walk(90)))
    running = rub * chatter * rattle + hiss
    thread = unit(ring(grit(1.5) * jolt, BODYWORK_MODES)) * (T > HAMMER_BLOWS[0][0])

    gears, jolts, motor = 0, 0, 0
    for s, hold_s, rise_s, fall_s, db, rumble_db in trigger_pulls:
        level = undb(db + gear_db_per_octave * octaves) * swell(s, hold_s, rise_s, fall_s)
        gears = gears + level * running
        jolts = jolts + level * undb(rumble_db) * thread
        motor = motor + level * whine
    return gears, jolts, motor


def scene():
    """Steel rings out into the garage, dull sounds have the strongest quick echoes, close ones the least."""
    gears, jolts, whine = driver()
    bright = gears + hammer() + steel() + skid() + sleeves()
    dull = knocks() + taps() + panel() + drag()
    close = ticks() + thumps() + cracks() + crackle() + jolts + catches() + whine + squeal() + trigger()
    return (garage(bright, near_db=5.5, far_db=4.0, pan_db=-1.5)
            + garage(dull, near_db=7.5, far_db=4.0, pan_db=-1.0)
            + garage(close, near_db=-2.5, far_db=-4.5, pan_db=-1.0, count=2)
            + room_noise())


def record(dry, top_hz=15800):
    """Cut the deepest bass gently and everything above the top steeply."""
    dry = signal.sosfilt(signal.butter(4, 40, "high", fs=SR, output="sos"), dry)
    return signal.sosfilt(signal.ellip(10, .2, 80, top_hz, fs=SR, output="sos"), dry)


dry = scene()
out = record(dry)
wrap_up_sound(out)
```